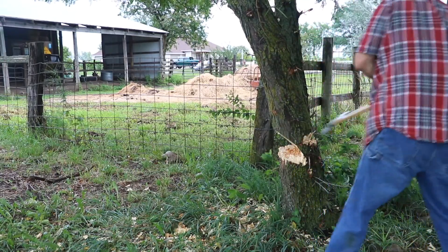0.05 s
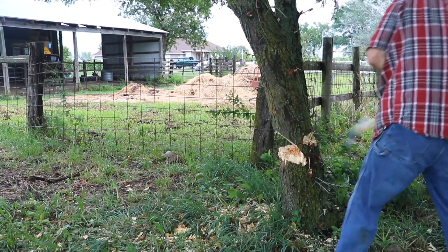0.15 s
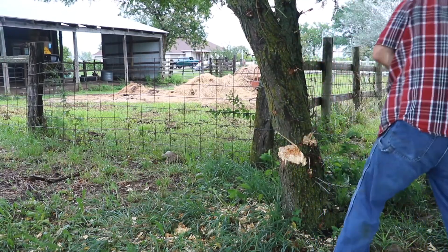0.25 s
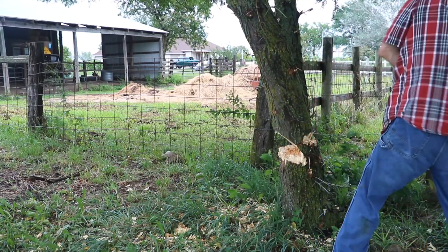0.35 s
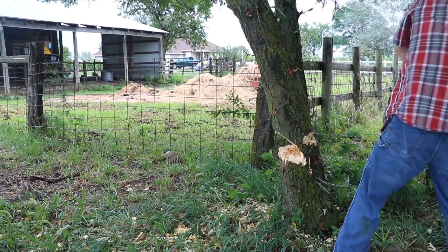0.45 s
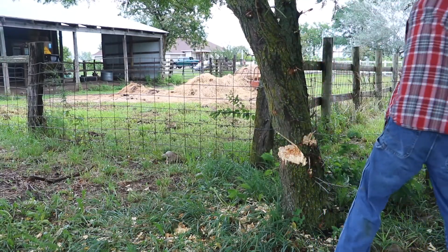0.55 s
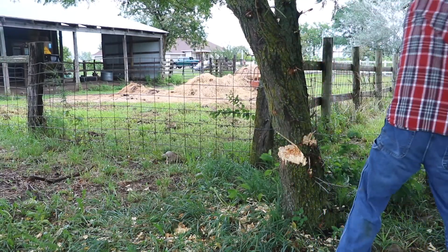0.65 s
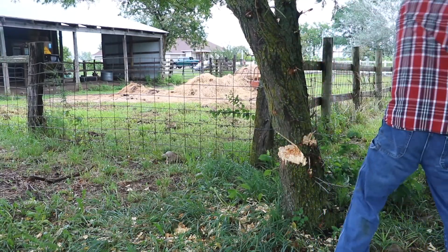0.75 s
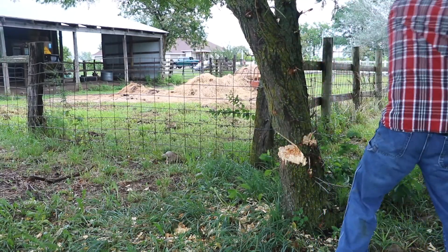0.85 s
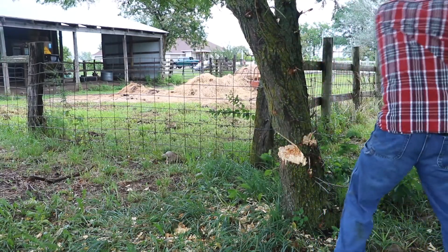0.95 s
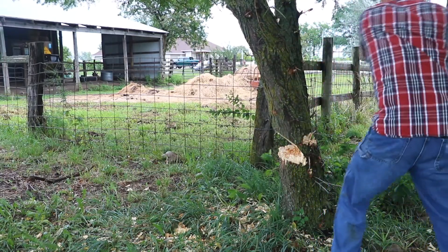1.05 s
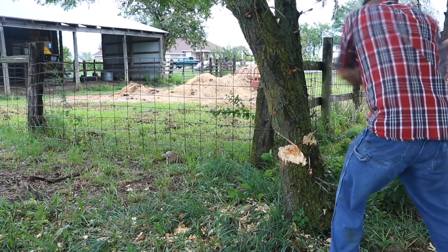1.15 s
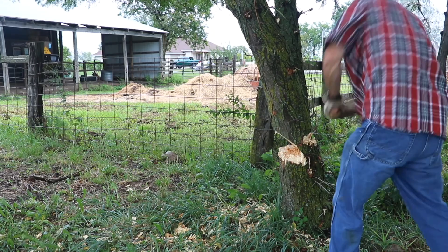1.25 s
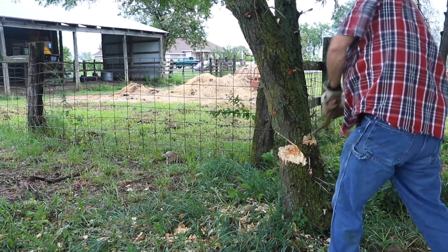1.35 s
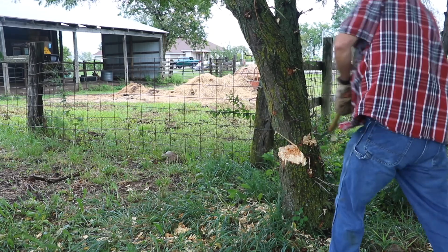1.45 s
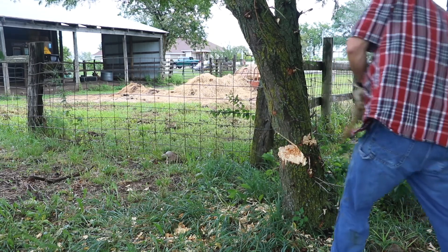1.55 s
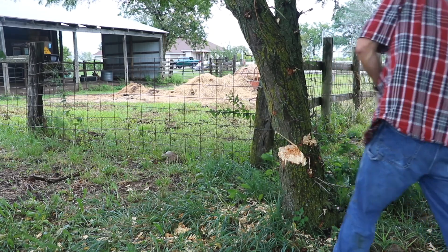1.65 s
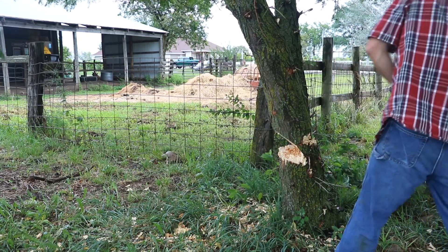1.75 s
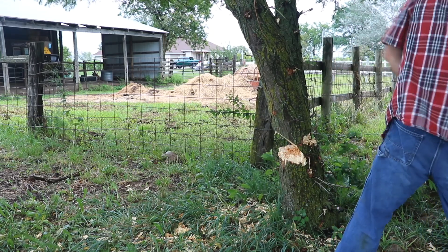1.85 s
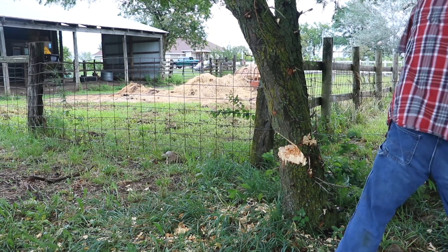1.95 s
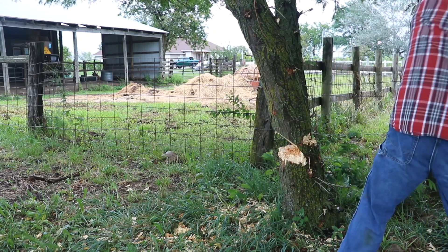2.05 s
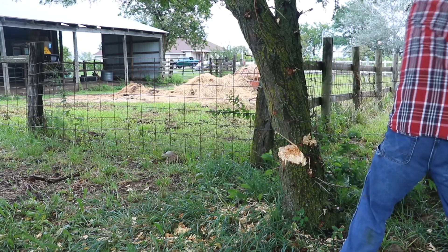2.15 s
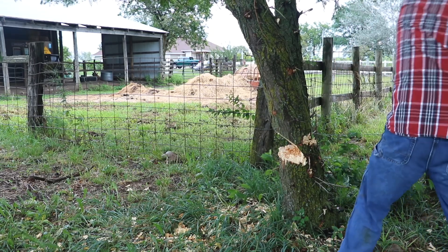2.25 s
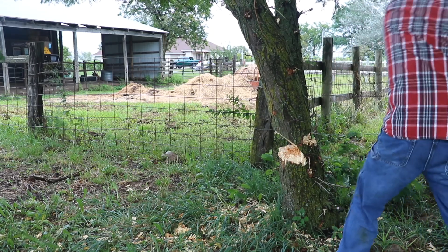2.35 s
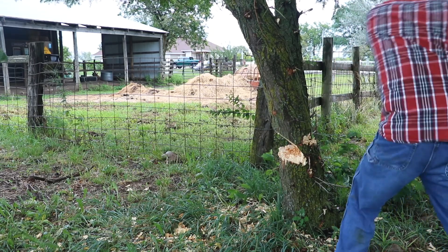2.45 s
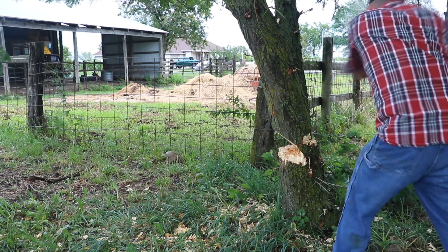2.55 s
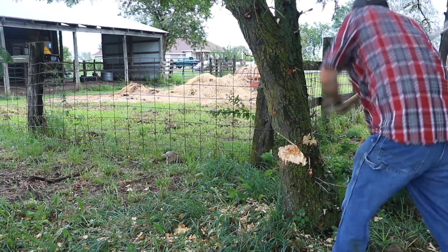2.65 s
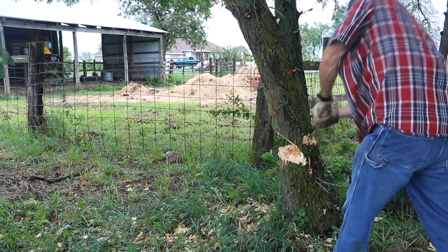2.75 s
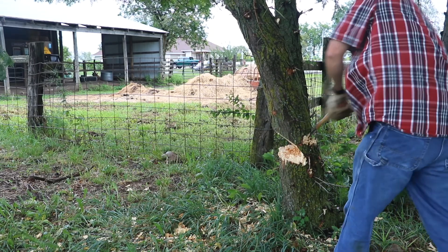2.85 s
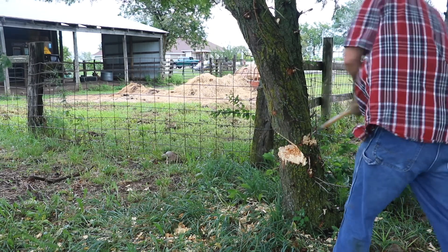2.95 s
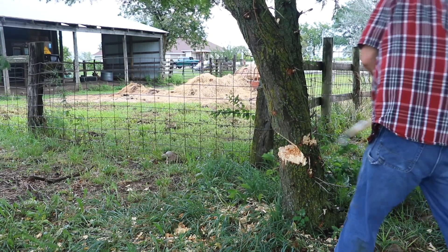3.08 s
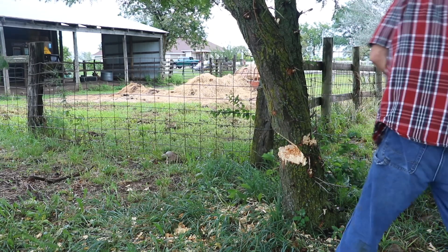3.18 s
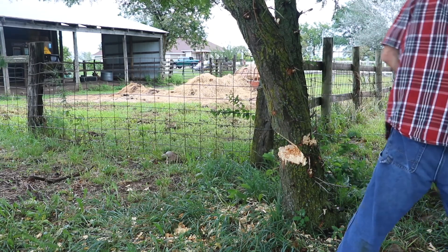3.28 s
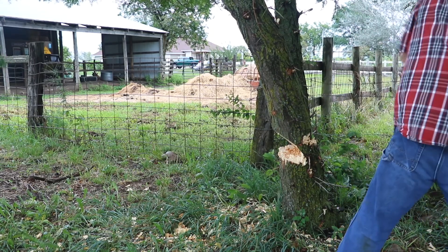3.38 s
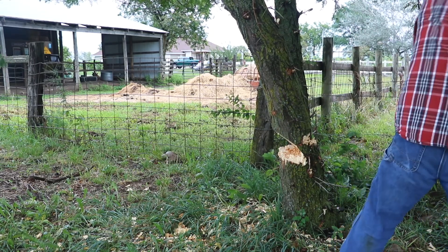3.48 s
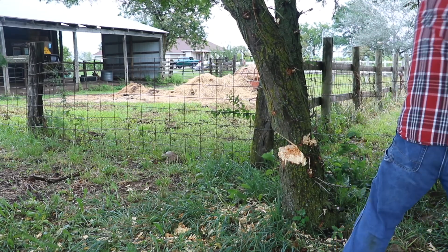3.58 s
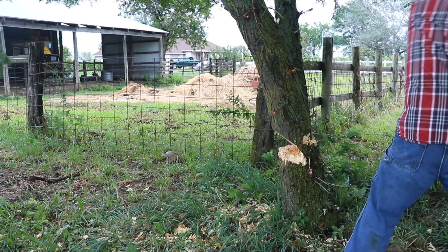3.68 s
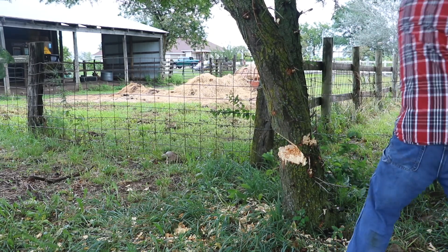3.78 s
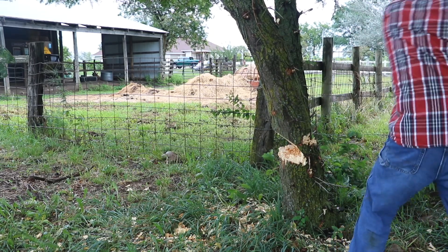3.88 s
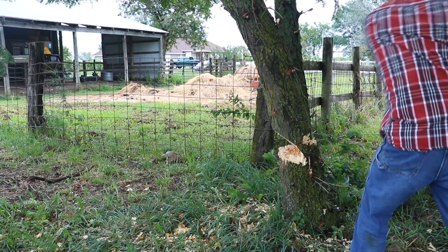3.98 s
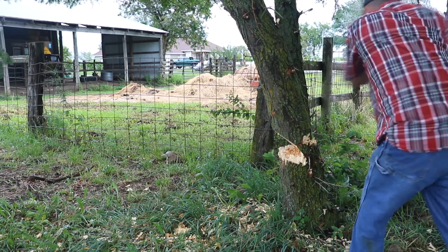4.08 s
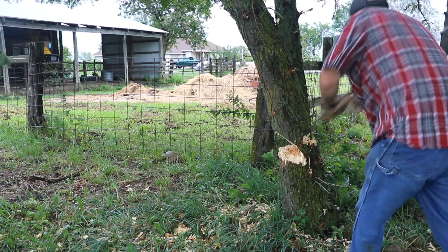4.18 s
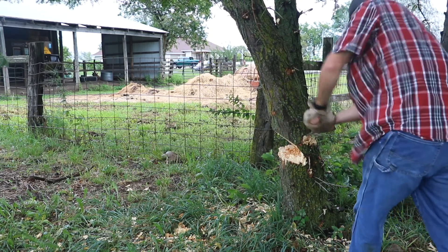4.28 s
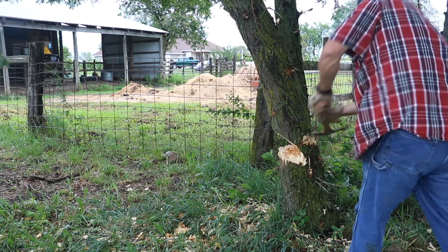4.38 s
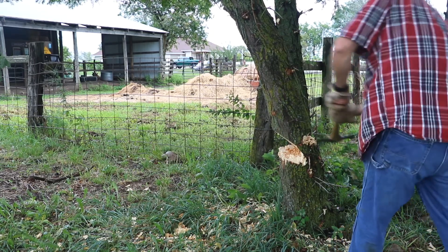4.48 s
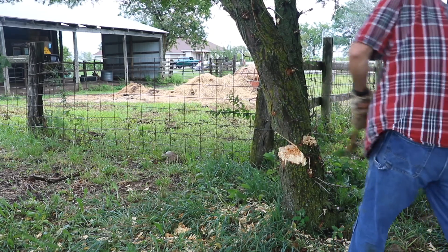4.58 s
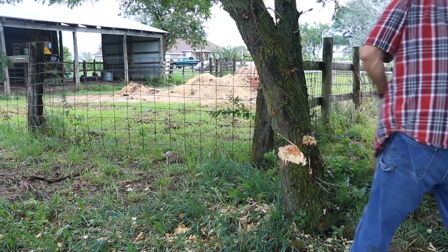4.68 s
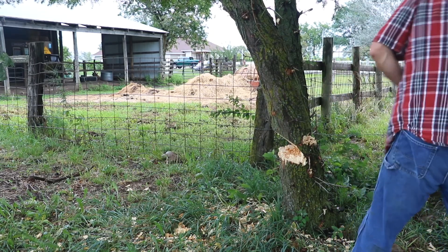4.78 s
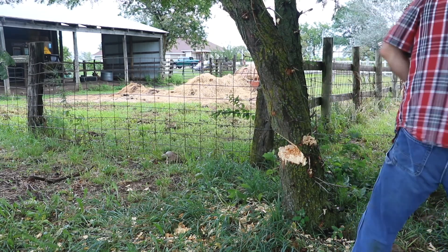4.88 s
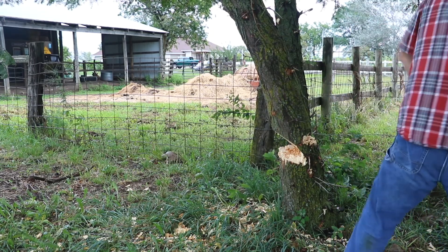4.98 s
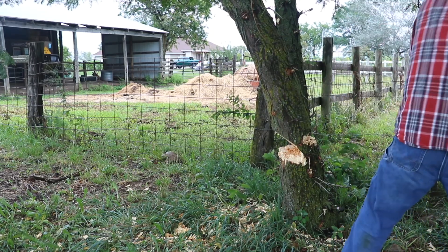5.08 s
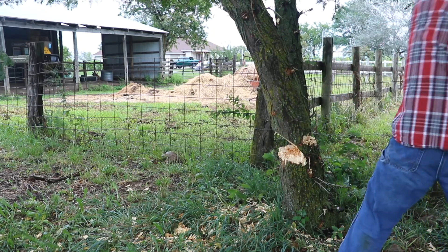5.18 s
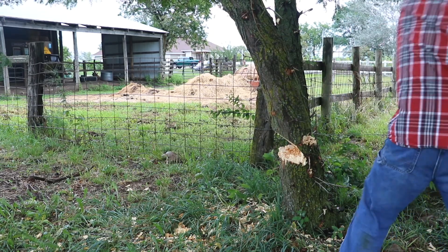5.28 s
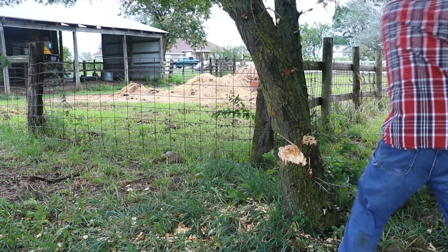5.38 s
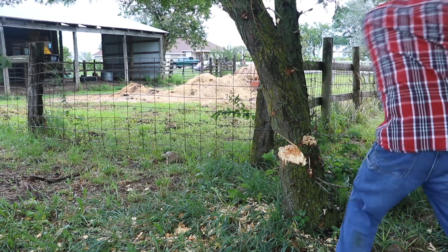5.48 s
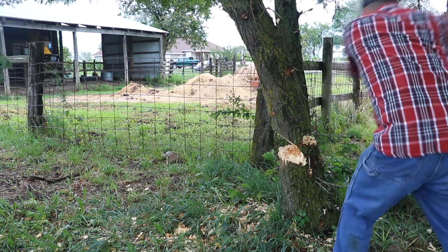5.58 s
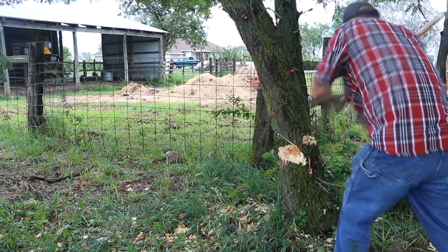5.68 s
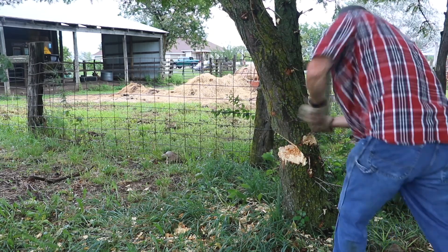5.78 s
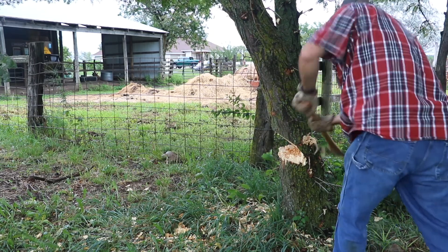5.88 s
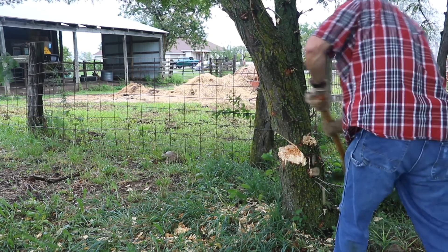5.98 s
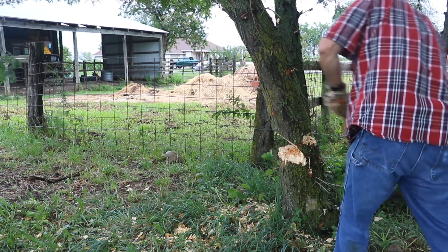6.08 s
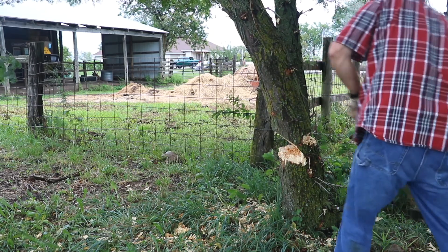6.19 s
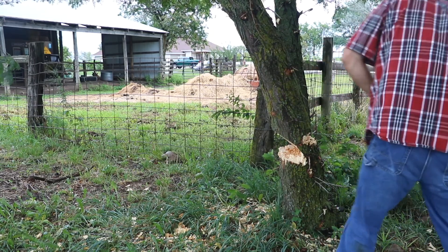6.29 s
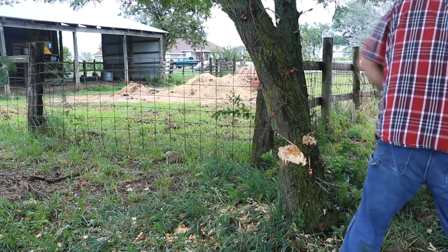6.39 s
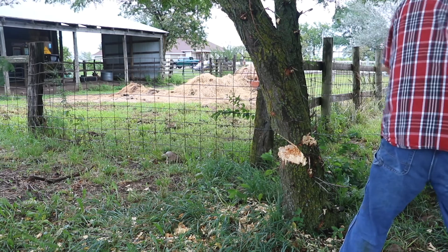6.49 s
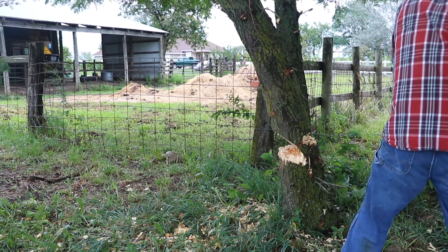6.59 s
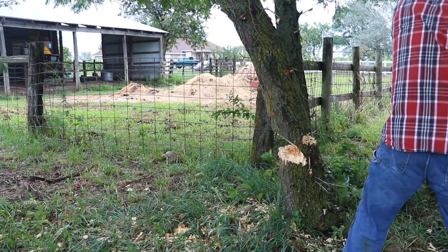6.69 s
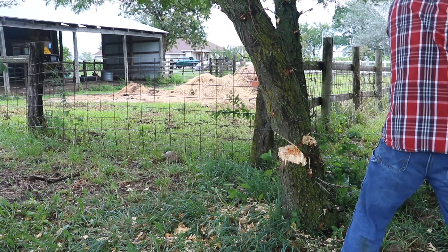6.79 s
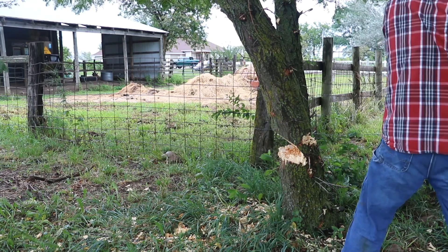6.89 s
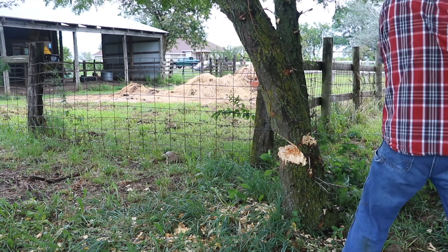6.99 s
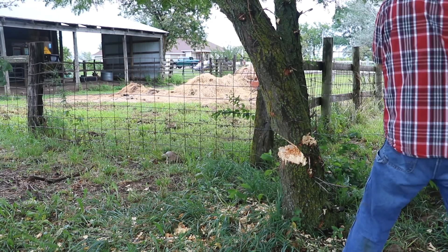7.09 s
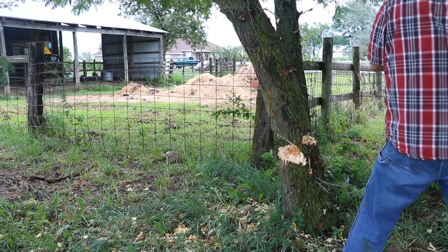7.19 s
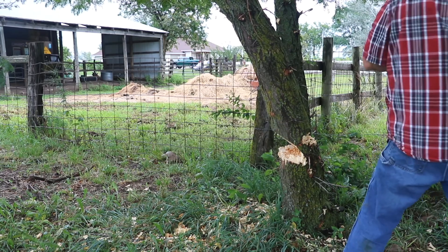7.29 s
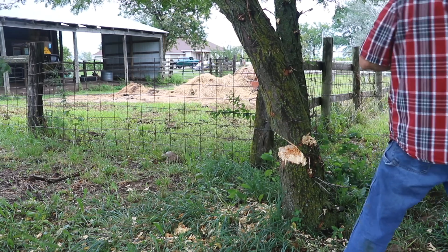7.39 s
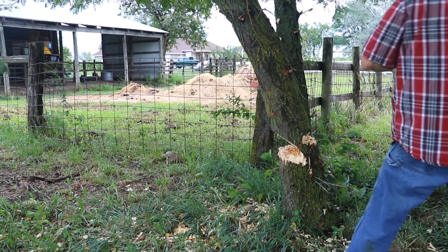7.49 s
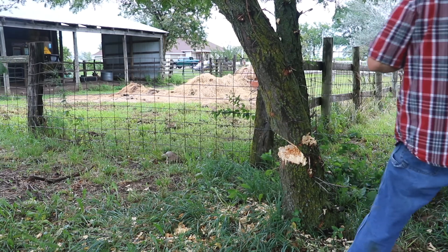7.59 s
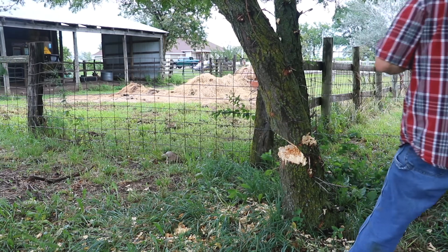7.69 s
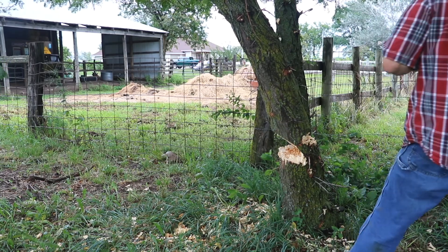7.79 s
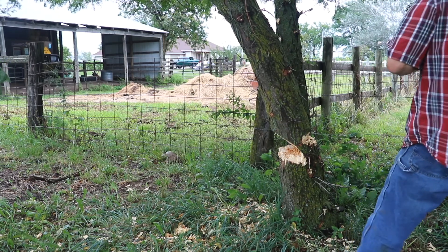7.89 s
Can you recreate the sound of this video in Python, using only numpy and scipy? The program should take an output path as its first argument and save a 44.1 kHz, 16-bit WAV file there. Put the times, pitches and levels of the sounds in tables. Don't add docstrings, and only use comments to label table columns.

```python
import sys
import numpy as np
from scipy import signal
from scipy.fft import rfft, irfft
from scipy.io import wavfile
from scipy.ndimage import uniform_filter1d

SR = 44100
rng = np.random.default_rng(int(sys.argv[2]) if len(sys.argv) > 2 else 0)


def how_loud(loudness_db):
    steps = np.asarray(loudness_db, float) / 20
    return 10 ** steps


def inscribe(sig):
    pcm = np.round(np.clip(np.atleast_2d(sig).T, -1, 1) * 32767)
    wavfile.write(sys.argv[1], SR, pcm.astype(np.int16))


N = 350154


def evened(x):
    return x / np.sqrt(np.mean(x ** 2) + 1e-20)


def read(points, hz):
    f, value = np.transpose(points)
    return np.interp(np.log(hz + 1), np.log(f + 1), value)


def curve(rows):
    rows = np.array(rows)
    return np.interp(np.arange(N) / SR, rows[:, 0], rows[:, 1])


def add(mix, start_s, sound):
    part = mix[round(start_s * SR):][:len(sound)]
    part += sound[:len(part)]


def filtered(x, order, hz, kind="low"):
    return signal.lfilter(*signal.butter(order, hz, kind, fs=SR), x)


def coloured(x, points):
    gain = how_loud(read(points, np.fft.rfftfreq(len(x), 1 / SR)))
    return evened(irfft(rfft(x) * gain, len(x)))


def resonate(x, hz, width_hz):
    r = np.exp(-np.pi * np.clip(width_hz, 5, 40000) / SR)
    c = r * np.cos(2 * np.pi * hz / SR)
    return 2 * (1 - r) * signal.lfilter([1, -c], [1, -2 * c, r * r], x + 1e-18)


def band(hz, width_hz):
    once = resonate(rng.standard_normal(N), hz, width_hz)
    return evened(resonate(once, hz, width_hz))


def drift(rate_hz):
    return evened(filtered(rng.standard_normal(N), 2, rate_hz))


def swell(top_s, length_s, level_db, rise_share, fall_db):
    late = (np.arange(0, N / SR + .002, .001) - top_s) / length_s
    away = np.where(late < 0, -late / rise_share, late / (1 - rise_share))
    return how_loud(2 * (level_db - fall_db * away))


def level(power):
    return np.interp(np.arange(N) / SR, np.arange(len(power)) / 1000, 10 * np.log10(power))


# pitch_hz, density_db_per_hz
CRACK = [(180, -11), (400, -4.5), (1100, 7.5), (2570, 7.5), (3130, 11.5), (3950, -1.5), (8790, 0.5),
         (16000, -18)]


def chop(blow_db, bite_s, crack_db, thump_db, modes, steel):
    skew_power = 0.92
    clean_push = 0.7
    jam_db = 2.5
    t = np.arange(16384) / SR
    sink = np.sin(np.pi * np.clip(t / bite_s, 0, 1) ** skew_power) ** 1.1
    sink += 0.19 * np.exp(-t / 0.0099) * (t > bite_s / 2)

    ring = np.zeros(len(t))
    for hz, width_hz, db in modes:
        fibres = rng.standard_normal(len(t)) * width_hz / 350
        push_wave = clean_push * np.sin(2 * np.pi * (hz * t + rng.random()))
        ring += 0.12 * how_loud(db) * evened(resonate((fibres + push_wave) * sink, hz, width_hz))
    tear = 0.5 * how_loud(crack_db) * coloured(rng.standard_normal(len(t)), CRACK) * sink
    trunk = sum(0.87 * np.sin(2 * np.pi * hz * t) for hz in (147, 202.6))
    thump = how_loud(thump_db - 60 * t / 0.065) * trunk * np.minimum(t / 0.0052, 1) ** 2
    near = 0.15 * ring + tear + thump
    wedged = np.sin(np.pi * np.clip(t / (1.18 * bite_s), 0, 1) ** skew_power)

    blurred = np.zeros(len(t))
    for hz, width_hz, db in modes + steel:
        blurred += how_loud(db) * resonate(t == 0, hz, 1.1 * width_hz) / np.sqrt(width_hz)
    blurred = evened(blurred) + 0.5 * how_loud(crack_db) * coloured(np.arange(len(t)) == 150, CRACK)
    return how_loud(blow_db) * how_loud(jam_db * wedged) * near, how_loud(blow_db) * evened(blurred) * np.std(near)


# start_s, blow_db, bite_s, crack_db, thump_db
CHOPS = [
    (1.3052, 2.5, 0.0053, -5.5, -15),
    (2.7584, -1, 0.007, -1.5, -11.5),
    (4.2702, -0.5, 0.007, -1, -15),
    (5.798, -4.5, 0.0073, -5.5, -10),
]
# pitch_hz, width_hz, level_db
WOOD = [
    [(1121, 530, 7), (802, 52, -3.5), (690, 310, -7.5), (1655, 230, -3.5), (1987, 530, -1.5),
     (2540, 440, 1), (3590, 640, -7), (4940, 1900, 4.5), (3200, 150, -13), (3830, 190, -4.5),
     (4400, 250, -4.5), (5066, 400, -5.5), (8750, 360, -2), (11780, 500, -5)],
    [(620, 170, 6.5), (869, 200, 2), (1100, 170, 5), (1770, 150, 3), (2045, 600, 8), (345, 130, -11),
     (2890, 710, 0.5), (4900, 500, -1), (3500, 400, -1.5), (6870, 560, -9), (8280, 250, -12),
     (8990, 550, -7), (213, 100, -11)],
    [(800, 110, 4), (402, 320, -5), (1624, 110, -4.5), (2435, 160, -2), (2950, 300, 0), (3266, 460, 5.5),
     (3540, 220, 2.5), (7700, 400, -0.5), (4480, 190, -4), (6000, 350, -4.5), (5200, 410, -11),
     (8600, 300, -16), (1820, 420, -12), (11900, 600, -9)],
    [(845, 75, 4), (2100, 730, -2.5), (3100, 190, 3.5), (5000, 2100, 6.5), (6700, 790, 0), (8800, 1300, 7),
     (3300, 120, -11), (488, 130, -7.5), (350, 150, -9), (1600, 240, -9.5), (4450, 190, -4),
     (5270, 200, -13), (8000, 200, -5), (11000, 680, -6)],
]
# pitch_hz, width_hz, level_db
STEEL = [
    [(1760, 140, -2), (3320, 180, -5), (5200, 600, -6), (9500, 400, -5)],
    [(780, 100, 11), (2630, 160, -9), (3100, 220, -21), (4900, 200, -14)],
    [(2190, 80, 5), (3300, 200, -18), (3700, 150, -8), (6500, 300, 0)],
    [(3270, 170, 7), (4000, 150, 2), (4700, 200, -12), (8000, 300, -6)],
]


def axe():
    blows, echoes = np.zeros((2, N))
    for (start_s, *row), modes, steel in zip(CHOPS, WOOD, STEEL):
        near, blurred = chop(*row, modes, steel)
        add(blows, start_s, filtered(near, 2, 95, "high"))
        add(echoes, start_s, signal.fftconvolve(blurred, yard()))
    return blows, echoes


# pitch_hz, t60_s
NEAR = [(150, 0.34), (800, 0.19), (3000, 0.23), (8000, 0.27), (15000, 0.19)]
# delay_s, level_db, spread_s, top_hz
ECHOES = [
    (0.031, -31.5, 0.018, 9300),
    (.08, -31.5, 0.26, 5500),
    (0.12, -37, 0.035, 4150),
    (0.163, -37, 0.048, 5200),
    (0.193, -37.5, 0.041, 4400),
    (.29, -44.5, .015, 3570),
    (.36, -62, 0.024, 2330),
    (0.487, -45.5, 0.014, 2200),
]


def yard():
    size = SR * 3 // 5
    t = np.arange(size) / SR
    _, frames_s, z = signal.stft(rng.standard_normal(size), SR, nperseg=128)
    t60_s = read(NEAR, np.fft.rfftfreq(128, 1 / SR))[:, None]
    tail = signal.istft(z * how_loud(-60 * frames_s / t60_s), SR, nperseg=128)[1][:size]
    tail *= np.minimum(t / 0.0084, 1)
    tail *= how_loud(-10) / np.linalg.norm(tail)
    for delay_s, level_db, spread_s, top_hz in ECHOES:
        late = np.maximum(t - delay_s, 0) / spread_s
        scatter = rng.standard_normal(size) * late * np.exp(-3 * late)
        clump = filtered(scatter, 2, [450, top_hz], "band")
        tail += how_loud(level_db + 3.5) * clump / np.linalg.norm(clump)
    return tail


def tick(peak_db, hz, t60_s, wide_db):
    t = np.arange(2048) / SR
    body = resonate(rng.standard_normal(len(t)) * how_loud(-60 * t / t60_s), hz, 0.4 * hz)
    wide = coloured(rng.standard_normal(len(t)), CRACK) * how_loud(-60 * t / (0.84 * t60_s))
    sound = body / abs(body).max() + how_loud(wide_db) * wide / abs(wide).max()
    sound *= np.minimum(t / 0.0018, 1)
    return how_loud(peak_db) * sound / abs(sound).max()


# start_s, peak_db, pitch_hz
TICKS = [(1.254, -30.5, 1200), (1.281, -24.5, 1200), (1.574, -26.5, 5270), (1.888, -29, 1220),
         (2.099, -32, 560), (2.11, -35, 850), (2.236, -38, 1010), (2.256, -33.5, 1350), (2.284, -36, 1000),
         (2.314, -35, 1600), (1.696, -37, 1280), (1.96, -36, 1620), (2.421, -45, 1530), (4.568, -35, 910),
         (4.995, -39, 918), (5.521, -33, 937), (5.617, -38, 1380), (2.7435, -22.5, 1280),
         (3.031, -28.5, 1770), (3.406, -28.5, 1150), (3.447, -33, 2190), (3.851, -31, 1630),
         (4.623, -32, 1180), (4.674, -32.5, 960), (4.722, -31.5, 1300), (4.765, -29.5, 1230),
         (5.451, -34, 1147), (5.478, -30, 1090), (6.979, -32.5, 3390)]
# start_s, peak_db, pitch_hz
TAPS = [(1.786, -31, 1440), (1.83, -26, 900), (2.519, -30.5, 1000), (2.665, -30, 1500),
        (2.721, -25.5, 1230), (5.13, -32, 1110), (5.269, -34, 700), (5.583, -27.5, 1080),
        (5.76, -29.5, 690), (5.771, -28, 869), (2.569, -31, 550), (1.796, -29, 1360), (4.633, -30, 1160),
        (5.948, -29, 4700), (5.781, -28, 1500), (5.861, -23, 680), (5.913, -26.5, 1740), (5.93, -26, 4080),
        (5.981, -34, 3020), (6.096, -31, 3000), (6.504, -30, 2500), (7.452, -24, 2100)]


def chips():
    out = np.zeros(N)
    for rows, t60_s, wide_db in ((TICKS, 0.1, -10), (TAPS, 0.03, 0)):
        for start_s, peak_db, hz in rows:
            add(out, start_s, tick(peak_db, hz, t60_s, wide_db))
    return out


# start_s, peak_db, pitch_hz, rise_s, t60_s
CHUNK = [(6.283, -31, 700, 0.0044, 0.069), (6.286, -18.5, 1606, .007, .02),
         (6.291, -18, 918, 0.0054, 0.055), (6.29, -31, 2150, 0.004, .05), (6.294, -29, 517, 0.0038, .07),
         (6.296, -21.5, 1810, 0.0036, 0.037), (6.296, -33, 3070, .005, 0.05),
         (6.332, -26.5, 768, 0.0062, 0.1), (6.334, -33, 480, 0.0054, 0.055), (6.35, -40, 623, .005, .06),
         (6.337, -26, 1050, 0.0065, 0.046), (6.341, -30, 573, .005, .06), (6.343, -29, 328, 0.0065, 0.089),
         (6.36, -36, 397, 0.01, .09)]


def chunk():
    out, t = np.zeros(N), np.arange(6000) / SR
    for start_s, peak_db, hz, rise_s, t60_s in CHUNK:
        rough = evened(resonate(rng.standard_normal(len(t)), hz, 350))
        note = np.sqrt(2) * np.sin(2 * np.pi * hz * t) + 0.53 * rough
        fade = how_loud(peak_db - 3 - 60 * np.maximum(t - rise_s, 0) / t60_s)
        add(out, start_s, fade * np.minimum(t / rise_s, 1) ** 2 * note)
    return out


# pitch_hz, density_db_per_hz
LEAVES = [(120, -24), (200, -13.5), (416, -11.5), (590, -5), (1870, -5.5), (2470, -4), (4430, -7),
          (7540, -3.5), (12800, -8.5), (16000, -23)]


def snap(peak_db, hz, second_hz, splinters_db):
    t = np.arange(6000) / SR
    width_hz = min(0.35 * hz, 2600)
    click = resonate(resonate(t == 0, hz, width_hz), hz, width_hz)
    click += 0.72 * resonate(resonate(t == 0, second_hz, width_hz), second_hz, width_hz)
    noise = rng.standard_normal(len(t))
    dull_hz = min(2 * 3.7 * max(hz, second_hz), 40000)
    splinters = resonate(coloured(noise, LEAVES), 0, dull_hz) / 2
    trail = evened(splinters + 0.55 * evened(resonate(noise, hz, 2 * width_hz)))
    fade = how_loud(-60 * t / 0.026) + 0.26 * how_loud(-60 * t / 0.3)
    trail *= how_loud(splinters_db - 3.5) * fade * np.minimum(t / 0.0011, 1)
    return how_loud(peak_db) * (click / abs(click).max() + trail)


# start_s, peak_db, pitch_hz, second_hz, splinters_db
SNAPS = [(0.0793, -16, 3300, 8000, -9.5), (0.3628, -22, 8450, 4500, -10), (1.058, -20, 7350, 9000, -14),
         (3.2124, -20, 7700, 11900, -6.5), (3.876, -25, 6700, 10600, 2), (3.906, -24, 5500, 7000, -5),
         (3.9313, -18, 10000, 4000, -20), (4.2236, -9, 2030, 3500, -7), (6.2572, -4.5, 8000, 12400, -25),
         (6.659, -17, 7400, 10600, -9.5), (6.761, -6.5, 3100, 8800, -11), (6.761, -5, 11900, 6060, -15),
         (6.7665, -14.5, 5000, 7500, -6), (6.8493, -1.5, 4130, 6140, -14), (6.8505, -11.5, 1500, 3300, -25),
         (6.9154, -17, 6300, 3500, -11.5), (7.1254, -13, 7800, 13100, -25), (7.129, -4, 7000, 9900, -21),
         (7.638, -18, 11100, 4300, -5.5), (7.755, -16.5, 8500, 11500, -9.5)]
# start_s, peak_db, pitch_hz
STEMS = [(0.846, -26.5, 7540), (1.031, -29, 10400), (1.214, -32, 9500), (2.43, -29.5, 10000),
         (2.516, -29.5, 9000), (3.137, -28.5, 5800), (3.535, -32, 9000), (4.097, -31, 9500),
         (3.9362, -31, 3500), (5.013, -29.5, 9900), (5.111, -28.5, 8000), (5.425, -29, 9500),
         (5.565, -27, 7000), (5.624, -36, 5000), (7.205, -48, 12400), (7.232, -36, 12500),
         (7.295, -26.5, 10000), (7.425, -29, 11500), (7.453, -42, 10000), (7.612, -24.5, 7000),
         (7.659, -22, 11500)]


def twigs():
    out = np.zeros(N)
    for start_s, *row in SNAPS:
        add(out, start_s, snap(*row))
    for start_s, peak_db, hz in STEMS:
        add(out, start_s, snap(peak_db, hz, 0.87 * hz, -6.5))
    return out


# start_s, peak_db, pitch_hz, t60_s
RINGS = [(1.3105, -15, 870, 0.022), (1.335, -23, 1760, .06), (1.335, -21, 5000, .03),
         (2.764, -10, 870, 0.04), (2.7605, -19.5, 360, .04), (4.2725, -17, 14700, .012),
         (4.272, -9, 3700, .02), (2.7605, -13, 2310, .022), (2.791, -26, 2630, .06),
         (1.3075, -14, 1270, .018), (7.637, -32.5, 540, 0.1), (2.767, -25, 4930, .03),
         (4.2236, -21, 1290, 0.025), (4.2245, -24, 2900, .02), (4.2237, -22, 7800, .015),
         (4.2298, -20, 890, 0.023), (4.2778, -18, 823, 0.05), (4.2794, -20, 3250, .04),
         (4.2787, -12.5, 2480, 0.045), (4.2785, -22, 3500, 0.036), (6.7607, -21.5, 2080, 0.03),
         (6.7607, -25, 3750, .03), (6.7611, -17, 7440, .012), (6.7687, -20, 7000, .012),
         (6.851, -30, 1530, 0.038), (6.8496, -19.5, 3410, .025), (6.85, -17, 4290, 0.022),
         (6.8502, -16, 5570, .025), (6.8494, -17, 8150, 0.014), (6.855, -27, 1980, 0.028)]
# start_s, peak_db, pitch_hz
CLICKS = [(0.3628, -27, 14500), (0.3632, -27, 5600), (2.5152, -24, 1760), (2.515, -29, 3200),
          (2.563, -34, 1700), (2.678, -31, 1000), (4.219, -31, 4200), (4.2238, -12, 12700),
          (6.3345, -26, 2500), (4.7225, -31, 1400), (4.2245, -19, 15200), (4.6245, -31, 2200),
          (4.6348, -32, 2000), (4.6435, -31, 1500), (4.7665, -29, 1900), (4.777, -32, 1500),
          (6.8492, -16, 9800), (6.8492, -18, 12800), (1.486, -26, 1780), (2.939, -30, 1200)]


def rings():
    out, t = np.zeros(N), np.arange(14000) / SR
    cracks = [(start_s, peak_db, hz, 11 / hz) for start_s, peak_db, hz in CLICKS]
    for start_s, peak_db, hz, t60_s in RINGS + cracks:
        fade = how_loud(peak_db - 60 * t / np.maximum(t60_s, .003))
        add(out, start_s, fade * np.sin(2 * np.pi * hz * t))
    return out


# top_s, length_s, level_db, low_part_db
MOVES = [(0.01, 0.83, -55.5, 8), (0.39, 0.56, -46.5, -1.5), (0.54, 0.38, -50, -11), (1.04, 0.65, -53, 6),
         (1.802, 0.51, -56, 8), (2.108, .1, -54.5, 6), (2.288, 0.22, -73, 14), (2.443, 0.19, -57.5, -14),
         (3.66, 0.41, -57.5, 6), (3.95, 0.17, -54, -15), (4.65, 0.089, -69, 8), (4.747, 0.18, -66, 12),
         (5.03, 0.13, -72, -7), (5.486, 0.15, -59.5, 6), (5.446, 0.18, -53, -15),
         (6.335, 0.098, -49.5, 15.5), (6.382, 0.4, -40, 1), (6.507, 0.19, -48, -1), (6.79, 0.37, -44, -22),
         (7.093, 1, -55, 2.5), (7.602, 0.14, -53, 16), (7.696, 0.4, -46, 0), (7.878, .3, -54.5, -11)]


def rustle():
    rise_share, fall_db, still_db = 0.22, 13, -60.5
    sizes_db = 1.5 * np.minimum(rng.exponential(1, N // 16 + 1), 5)
    grains = rng.standard_normal(N) * how_loud(sizes_db.repeat(16)[:N])
    leaves = coloured(grains, LEAVES)
    low = filtered(leaves, 1, 3500)
    high_power = low_power = how_loud(2 * still_db)
    for top_s, length_s, level_db, low_part_db in MOVES:
        high_power = high_power + swell(top_s, length_s, level_db, rise_share, fall_db)
        low_power = low_power + swell(top_s, length_s, level_db + low_part_db, rise_share, fall_db)
    flutter = how_loud(7.5 + 1.3 * drift(15.5))
    return flutter * (how_loud(level(high_power)) * (leaves - low) + how_loud(level(low_power)) * low)


# time_s, level_db
WIND = [(0, -42.5), (.5, -43.5), (1, -47.5), (1.4, -51.5), (1.7, -50), (2.1, -44), (2.6, -46), (2.92, -51),
        (3.45, -49), (3.8, -46.5), (4.3, -55.5), (4.62, -63), (5.05, -48), (5.5, -51.5), (6.1, -58),
        (6.9, -50), (7.5, -40.5), (7.94, -46)]
# pitch_hz, density_db_per_hz
GUST = [(8.8, -52), (15, -7), (53, 1.5), (119, 1.5), (167, -5.5), (231, -12.5), (275, -15.5), (329, -16.5),
        (700, -32.5), (910, -53), (1540, -120)]
# top_s, length_s, level_db
GUSTS = [(0.135, 0.12, -31.5), (0.322, 0.24, -31.5), (0.56, 0.064, -46), (0.66, 0.52, -35.5),
         (1.047, 0.041, -35), (1.123, 0.11, -35.5), (1.46, .06, -43), (1.556, 0.31, -44),
         (1.78, 0.21, -36.5), (2.27, 0.36, -39), (2.477, 0.056, -41), (2.745, 0.068, -57),
         (2.985, 0.12, -30.5), (3.242, 0.25, -34.5), (3.333, 0.1, -37), (3.538, 0.081, -38),
         (3.817, 0.14, -40.5), (4.716, .12, -35), (4.884, 0.19, -37), (5.241, 0.05, -27.5),
         (5.38, .15, -41), (5.652, 0.15, -28.5), (5.783, 0.084, -28), (6.217, 0.11, -46),
         (6.4, 0.27, -39.5), (6.716, 0.23, -37.5), (7.217, 0.053, -33.5), (7.345, 0.23, -28.5),
         (7.637, 0.15, -30.5), (7.84, 0.34, -29.5)]
# start_s,
# peak_db, pitch_hz
POPS = [(0.56, -27, 71), (1.78, -25.5, 99.5), (2.973, -18.5, 109), (3.219, -22, 131), (3.236, -19, 105),
        (3.307, -27, 142), (3.341, -16.5, 133), (3.367, -19, 114), (5.239, -28, 147), (5.279, -23.5, 108),
        (5.644, -22, 102), (5.678, -18, 128), (6.214, -28, 99), (6.715, -27, 154), (6.742, -25.5, 94.5),
        (7.623, -26, 84), (7.659, -28, 84), (7.783, -22, 80.7), (7.824, -14, 193), (7.888, -6, 120),
        (0.341, -19, 135), (0.624, -22.5, 154), (3.154, -30, 116), (3.709, -41, 99), (5.109, -37, 99),
         (5.665, -21, 243), (6.29, -26.5, 170), (6.345, -26, 149), (6.629, -32.5, 83), (7.326, -17.5, 131)]


def push(phase):
    return (1 - 2 * phase ** 2) * np.exp(-phase ** 2)


def wind():
    lumps = coloured(rng.standard_normal(N), GUST)
    lumps /= np.sqrt(abs(uniform_filter1d(lumps ** 2, size=2600)) + 0.19)
    gusts = sum(swell(*row, 0.4, 17.5) for row in GUSTS)
    power = how_loud(2 * curve(WIND)) + how_loud(2 * level(gusts + 1e-12))
    force_db = np.minimum(10 * np.log10(power), -27)
    reach = evened(filtered(rng.standard_normal(N), 2, [180, 550], "band"))
    reach_db = 0.5 * (force_db + 37) - 17.5
    out = how_loud(force_db + 2.46 * drift(24)) * (evened(lumps) + how_loud(reach_db) * reach)
    for start_s, peak_db, hz in POPS:
        phase = np.pi * np.arange(-600, 600) / SR * hz
        eddy = push(phase) + 0.12 * push(3.7 * phase - 1.5)
        add(out, start_s - .008, how_loud(peak_db) * eddy * rng.choice([-1, 1]))
    return filtered(out, 2, 35, "high")


# pitch_hz, width_hz, level_db
INSECTS = [(7000, 600, -58), (7700, 1500, -57.5), (8080, 600, -61)]
# time_s, level_db
CHORUS = [(0, -1), (.7, -4), (1.4, -1), (2, 1), (2.6, -1), (3, -2), (3.6, 0.5), (4.2, -3), (4.5, -3),
          (5.1, -0.5), (5.7, -2), (6.1, -7), (6.9, 0), (7.4, -0.5), (7.94, -7)]
# pitch_hz, width_hz, level_db
CRICKETS = [
    (7270, 170, -55),
    (8270, 150, -55),
]
# time_s, chirps_so_far
CHIRPS = [
    [(0, -7.3), (1.73, 0), (3.38, 7), (4.55, 13), (5.27, 16), (7.25, 25), (7.94, 28)],
    [(0, -6.8), (.78, -4), (1.82, 0), (3.8, 8), (4.64, 11), (5.49, 14), (6.21, 17), (7.94, 23.5)],
]


def insects():
    out, chorus_db = np.zeros(N), curve(CHORUS)
    for hz, width_hz, level_db in INSECTS:
        out += how_loud(level_db + chorus_db + 2.5 * drift(4.5)) * band(hz, width_hz)
    for (hz, width_hz, level_db), chirps in zip(CRICKETS, CHIRPS):
        uneven = how_loud(level_db + chorus_db + 1.5 * drift(3.2))
        trill = band(hz, width_hz)
        trill /= np.sqrt(uniform_filter1d(trill ** 2, size=1500) + .1)
        out += uneven * trill * np.cos(np.pi * curve(chirps)) ** 4
    return out


# start_s, length_s, from_hz, to_hz, level_db
BIRD = [(.09, 0.055, 1520, 1580, -50), (.1, .03, 1670, 1700, -52), (.165, 0.04, 1600, 1670, -53),
        (.2, .09, 1610, 1570, -59), (.16, 0.05, 2140, 2180, -53), (.815, .075, 1690, 1830, -50),
        (.875, .045, 1810, 2120, -50)]


def bird():
    out = np.zeros(N)
    for start_s, length_s, from_hz, to_hz, level_db in BIRD:
        u = np.arange(0, 1, 1 / (length_s * SR))
        hz = from_hz + (to_hz - from_hz) * u ** 2
        note = np.sin(2 * np.pi * np.cumsum(hz) / SR) * np.sin(np.pi * u)
        add(out, start_s, how_loud(level_db + 4) * note)
    return out


# pitch_hz, density_db_per_hz
AIR = [(59, 1), (100, -2), (140, 1), (244, -2), (1550, -4.5), (3400, -8), (4980, -14.5), (6020, -18.5),
       (7140, -11), (12700, -75), (14700, -42), (16000, -54)]


def fields():
    return how_loud(-47 + 0.5 * drift(0.27)) * coloured(rng.standard_normal(N), AIR)


def scene():
    blows, echoes = axe()
    small = chips() + chunk()
    echoes += 0.64 * signal.fftconvolve(small, yard())[:N]
    near = blows + small + twigs() + rings() + rustle()
    return (near + echoes + insects() + bird() + fields() + wind())[None]


def band_limit(x):
    return signal.sosfilt(signal.butter(12, 15880, fs=SR, output="sos"), x)


def record(dry):
    power_db = 10 * np.log10(signal.lfilter(np.ones(256) / 256, 1, dry[0] ** 2) + 1e-12)
    back_db = np.arange(N) * 8.3 / SR
    held_db = np.maximum.accumulate(power_db + back_db) - back_db
    over_db = np.maximum(held_db + 8.5, 0)
    ducked = dry / how_loud(0.5 * signal.lfilter(np.ones(1024) / 1024, 1, over_db))
    clipped = np.clip(ducked, -.97, .97)
    leak = how_loud(-20)
    steep = signal.oaconvolve(clipped, signal.firwin(301, 15860, fs=SR)[None], "same")
    finished = leak * filtered(clipped, 8, 16600) + (1 - leak) * steep
    return band_limit(finished)


dry = scene()
out = record(dry)
inscribe(out)
```